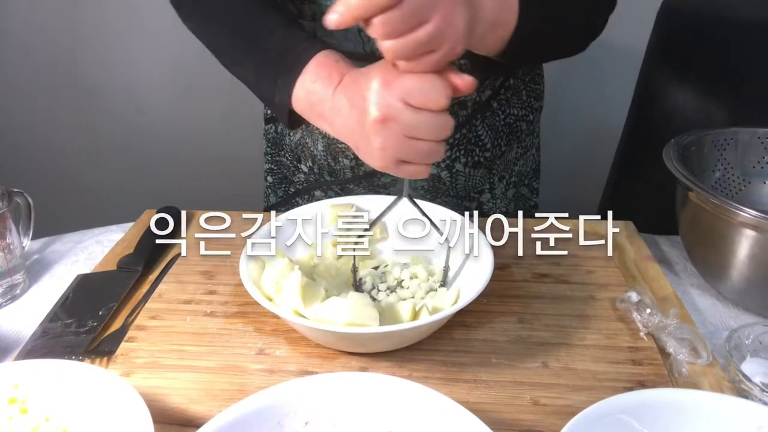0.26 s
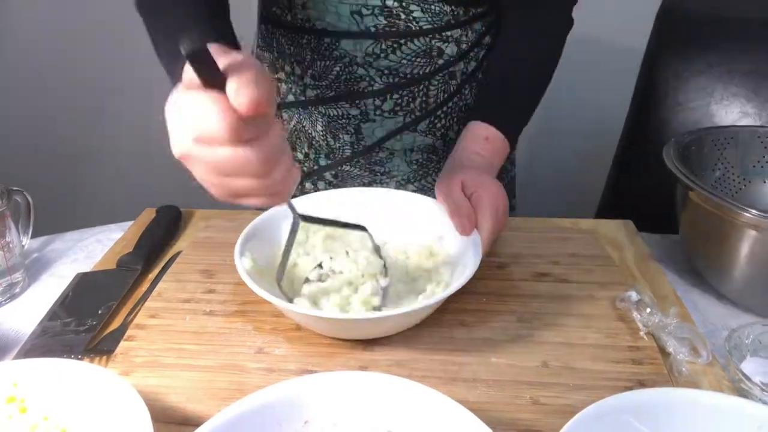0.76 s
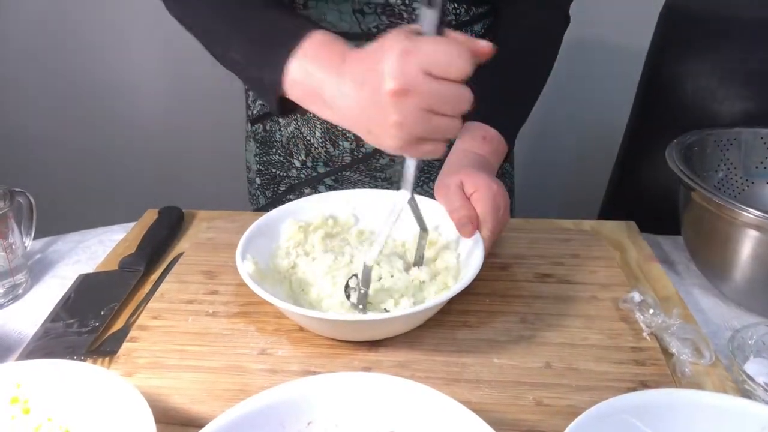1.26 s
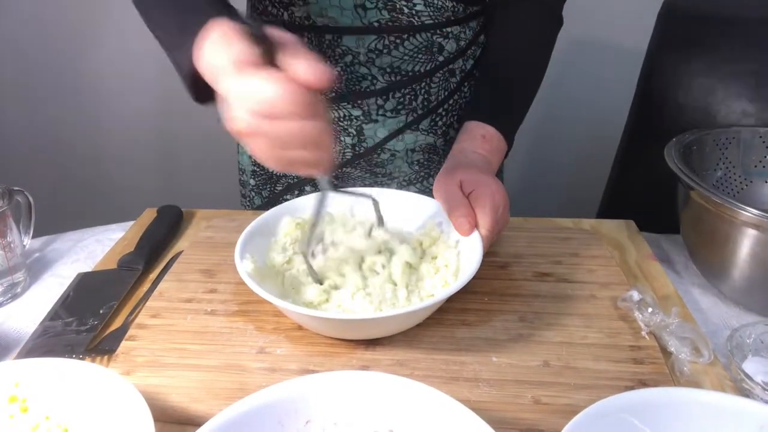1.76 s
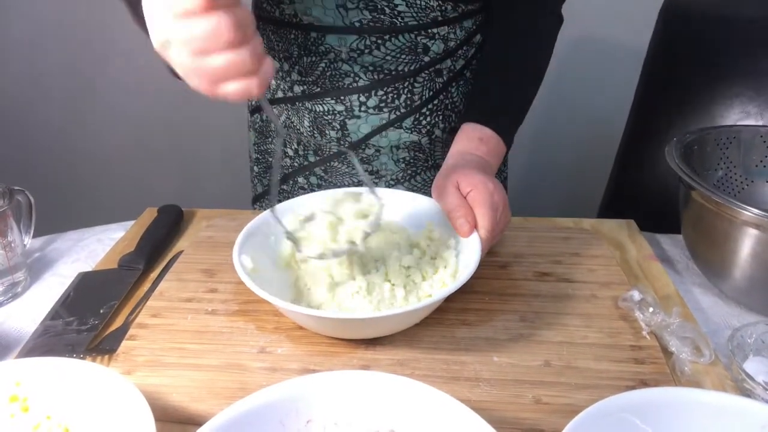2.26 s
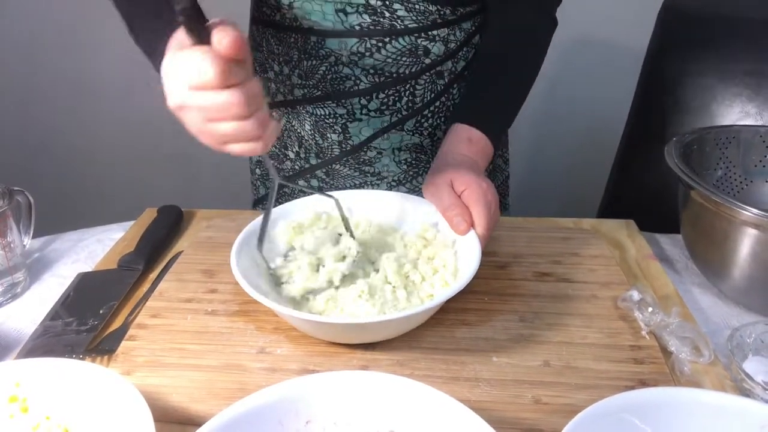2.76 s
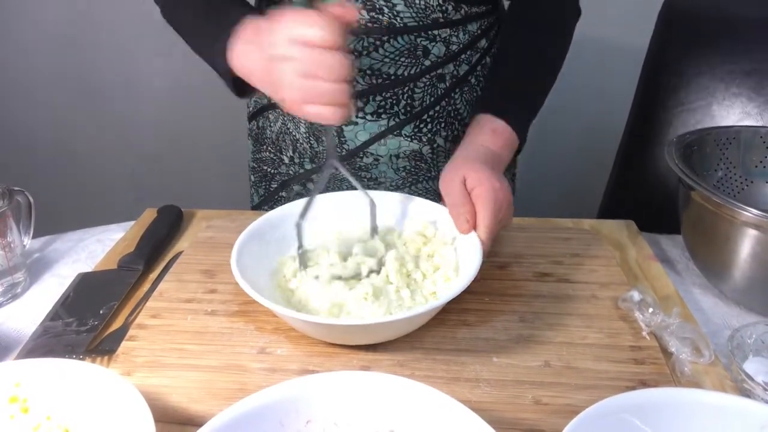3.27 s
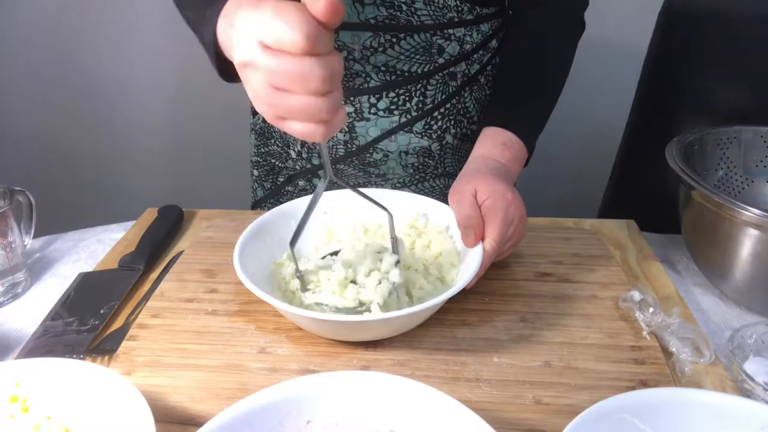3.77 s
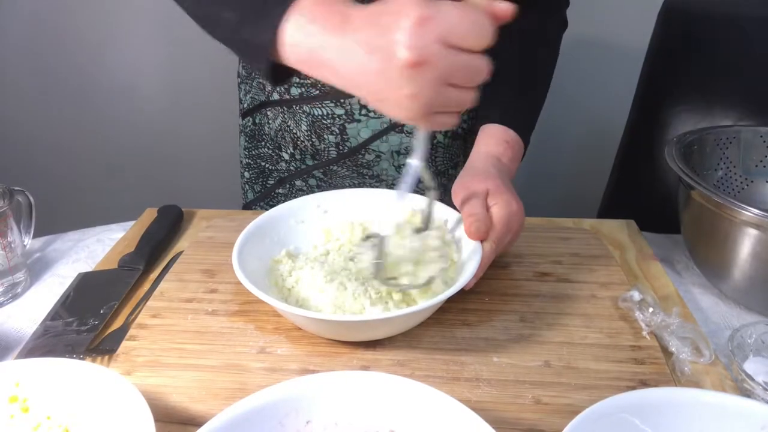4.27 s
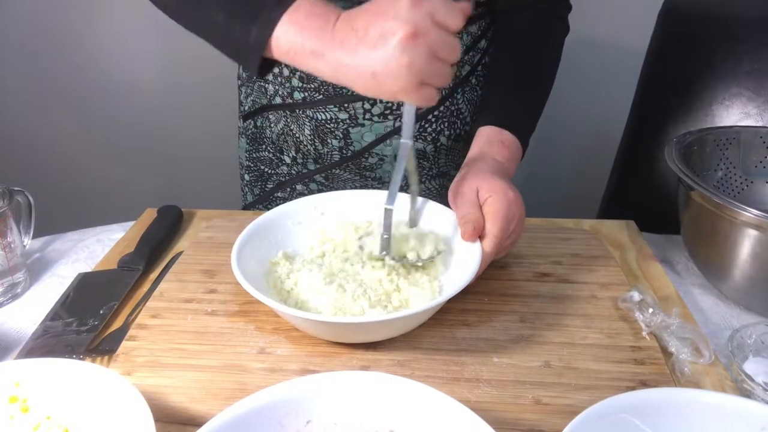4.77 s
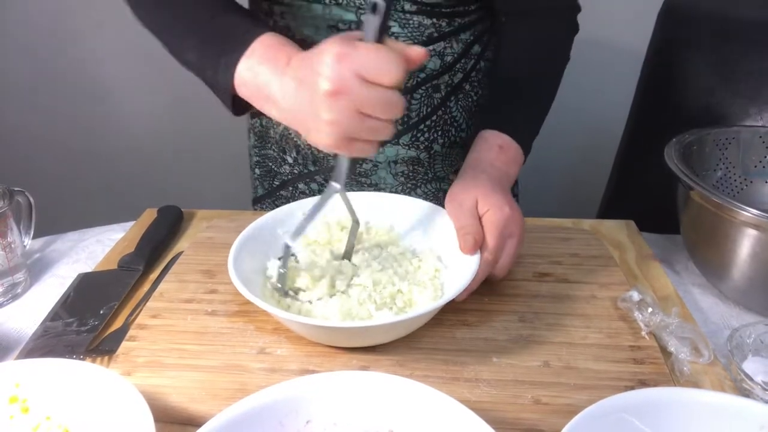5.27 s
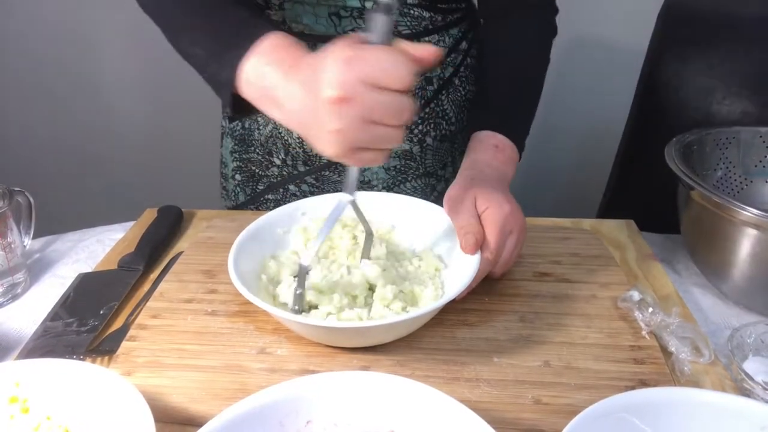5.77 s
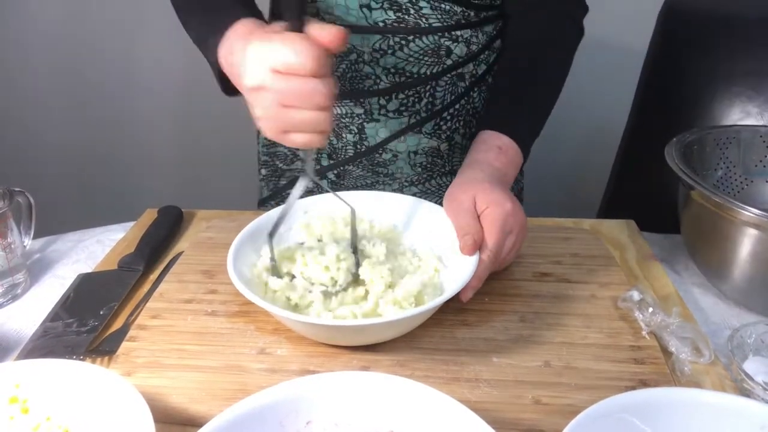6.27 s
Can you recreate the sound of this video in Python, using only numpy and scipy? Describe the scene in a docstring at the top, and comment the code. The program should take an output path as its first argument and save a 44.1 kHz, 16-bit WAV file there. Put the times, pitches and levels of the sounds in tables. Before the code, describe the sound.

Loud hum and room noise with soft squishes drop suddenly, then a wire masher softly clinks on a ceramic bowl, ending in a dull thud.

```python
"""A steel potato masher works boiled potatoes in a hand-held ceramic bowl on a wooden board.
At first hum and room noise are loud and the mash squishes: bursts of filtered noise over a faint rustle.
At 0.7 s the background drops, dips briefly and goes on lower, its mains hum beating against a slower motor.
From 1.1 s the wire knocks the bowl: damped modes and noise swell in softly and die away, amid short drags.
Last the bowl lands on the board with a dull thud, two low thumps and a faint squish."""
import sys
import numpy as np
from scipy import signal
from scipy.fft import rfft, irfft, next_fast_len
from scipy.io import wavfile

SR = 44100
rng = np.random.default_rng(int(sys.argv[2]) if len(sys.argv) > 2 else 0)


def transcribe(u):
    """Save the signal u as a 16-bit wav file named by the first command-line argument.

    u: samples, shape (n,) or (channels, n), limited to [-1, 1]; the rate is SR.
    q: integer samples, one column per channel.
    """
    v = np.clip(np.atleast_2d(u).T, -1, 1)
    q = np.round(v * 32767).astype(np.int16)
    wavfile.write(sys.argv[1], SR, q)


N = 288051

# overtones of the mains hum, before and after the drop; f is rounded to a multiple of 60 Hz:
# (f/Hz, early level/dB, later level/dB)
HUM_OVERTONES = [(119, -52.5, -63.5), (180, -70, -86.5), (240, -73, -87.5), (360, -79, -91),
                 (420, -73, -85.5)]
# relative spectral density of the room noise before and after the drop: (f/Hz, level/dB)
EARLY_ROOM_SPECTRUM = [(94, -22), (160, -13), (239, -2), (307, -2.5), (417, -1.5), (495, -6), (879, -6.5),
                       (2080, -16.5), (4470, -17.5), (10400, -30), (15500, -29)]
LATER_ROOM_SPECTRUM = [(94, -30), (160, 3), (205, -8.5), (239, -5), (325, -8.5), (364, -5), (386, -10),
                       (417, -9), (495, -12), (611, -11.5), (913, -13), (3760, -31), (15500, -46)]
# relative spectra of the low rumble and of the moist rustle: (f/Hz, level/dB)
RUMBLE_SPECTRUM = [(15, -8), (35, 2.0), (100, 1.0), (170, -4.5), (260, -21.0), (1000, -74.0)]
RUSTLE_SPECTRUM = [(500, -22.5), (1500, 4), (4000, 4.5), (7000, -2.5), (15000, -7.5)]
# soft short bursts: squishes, and two low thumps after the last thud; level before the Gaussian outline:
# (t/s, Gaussian half length/s, level/dB, centre f/Hz, spectral width/octaves)
SOFT_BURSTS = [(0.149, 0.017, -64, 6600, 1), (0.463, 0.015, -69, 4500, 0.43),
               (0.535, 0.013, -64, 3680, 0.43), (0.595, 0.025, -68, 11000, 1),
               (0.605, 0.034, -64.5, 2240, 0.75), (0.776, 0.015, -66, 1270, 0.16),
               (0.774, 0.0099, -77.5, 3980, 0.58), (2.036, 0.012, -64.5, 1440, 0.64),
               (2.087, 0.025, -71.5, 1540, 0.51), (2.175, 0.023, -69.5, 810, 1),
               (2.195, 0.013, -76.5, 6900, 1), (3.049, 0.035, -75.5, 3300, 0.32),
               (5.478, 0.024, -81, 6130, 1), (6.197, 0.0051, -51, 333, 0.39),
               (6.228, 0.0042, -59, 322, 0.43), (6.449, 0.02, -78, 2060, 0.25)]
# the wire drags on the glaze, level before the Gaussian outline:
# (t/s, Gaussian half length/s, level/dB, favoured f/Hz, treble tilt/dB per octave)
SCRAPES = [(2.617, 0.012, -59.5, 3930, -2.5), (2.639, 0.0088, -44, 4020, -3.5),
           (2.698, 0.027, -57, 2020, -1.5), (2.733, .015, -63, 6080, -1), (3.888, 0.0092, -70, 3930, 7),
           (4.389, 0.016, -62, 3590, -3.5)]
# modes in which bowl and wire ring together, relative level: (f/Hz, level/dB, t60/s)
MODES = [(251, -6, 0.31), (340, -7.5, 0.28), (602.3, -6.5, 0.13), (824, -12, .12), (1042, -4.5, 0.14),
         (1211, 2.5, 0.084), (1332, 3, 0.2), (1403, -1.5, 0.1), (1840, -5.5, 0.091), (2022, -4, 0.085),
         (2240, -2.5, 0.12), (2330, -9, 0.098), (2430, -1, 0.11), (2554, -4.5, 0.13), (2743, -5, 0.16),
         (2986, -7, 0.09), (3442, -4, 0.18), (3630, -2, 0.14), (3870, -3, .12), (3933, -1.5, .11),
         (4070, -1, 0.11), (4430, -3, .12), (4520, -4.5, .12), (4700, -0.5, 0.19), (4980, -2, 0.16),
         (6045, 0.5, 0.18), (6840, -9, .11), (7520, -5, 0.099), (7930, -10.5, .1), (9110, -1, 0.08),
         (10020, -7, .07), (10970, -3.5, .07), (13000, -6, .06)]
# broadband contact noise between the modes, relative level: (f/Hz, level/dB)
CRACK_SPECTRUM = [(70, -35), (170, -0.5), (450, -8), (900, -6.5), (1650, -3.5), (2100, -9.5), (5000, -6.5),
                  (5550, -13), (6400, -5), (8300, -8.5), (9700, -6), (10400, -10.5), (12000, -7.5),
                  (15500, -12)]
# decay of the contact noise after a blow: (f/Hz, t60/s)
CRACK_DECAY = [(300, 0.12), (1300, 0.18), (3000, 0.18), (6000, 0.18), (12000, 0.1)]
# edges of the six registers thud, knock, clack, clink, ping, tick: (f/Hz)
REGISTER_EDGES = [190, 900, 1850, 3100, 5400, 8300, 15500]
# masher on bowl; the last is a dull thud of the bowl on the board:
# (t/s, width of the peak/s, swell-in level/dB, ring over crack in the low registers/dB,
#  four favoured f/Hz, two nodal f/Hz, six register levels around the peak/dB)
BLOWS = [(1.09, 0.005, -8.5, -8.5, 1410, 2300, 3425, 6040, 1900, 5600, -58, -54.5, -50, -52, -67, -63.5),
         (1.917, 0.0038, -9, -7, 1360, 3950, 4460, 9150, 2416, 7280, -55, -41.5, -47.5, -40.5, -49.5, -50),
         (2.353, 0.0083, -14.5, -5.5, 1380, 2745, 3570, 9160, 1130, 5450, -64, -49.5, -50.5, -50.5, -64, -61.5),
         (2.654, 0.0021, -6, -8, 2764, 3420, 4026, 6040, 2290, 5480, -59.5, -54, -46, -41.5, -61, -56),
         (2.937, 0.0053, -10, -2, 2570, 4420, 6870, 7930, 1750, 3090, -59.5, -55.5, -46.5, -46, -48, -55),
         (3.820, 0.0076, -7, -8.5, 2330, 2980, 4100, 6150, 1940, 8080, -55.5, -52.5, -47, -42, -50, -58.5),
         (4.322, 0.0076, -20.5, -5.5, 1049, 2244, 2430, 3590, 3190, 4320, -59, -57, -50, -57.5, -67.5, -69.5),
         (4.726, 0.0061, -11.5, -3.5, 1215, 3420, 4200, 4660, 3020, 8200, -60.5, -55, -53.5, -50.5, -56.5, -61.5),
         (5.045, 0.007, -16, 3.5, 1184, 2447, 4680, 6080, 1770, 5450, -58, -48.5, -38, -46, -45, -51.5),
         (5.855, 0.011, -16, -13.5, 1040, 1180, 1350, 2020, 5600, 6040, -74, -62, -71.5, -75.5, -81, -82.5),
         (6.181, 0.015, -7, -11, 250, 360, 610, 1400, 930, 5530, -55.5, -65.5, -83.5, -92.5, -100, -105)]

EARLY_ROOM_DB, LATER_ROOM_DB = -64, -75
DROP_S, DIP_END_S = 0.711, 0.741  # midpoint of the fall; the later level is half of full gain here
MAINS_HZ, MAINS_DB = 59.9, -65.5
# the motor lags the mains by SLIP_HZ and is in step with it at IN_STEP_S
MOTOR_DB, SLIP_HZ, IN_STEP_S = -75, 2.39, 3.46
TOP_HZ = 15750
TIME = np.arange(N) / SR
LOCAL = np.arange(-4410, 13230) / SR  # time around one event (s)


def undb(db):
    """A level in decibels is twenty times the logarithm of the gain."""
    return 10 ** (np.asarray(db) / 20)


def unit(x):
    """Normalisation brings the root mean square to 1."""
    return x / np.sqrt(np.mean(x ** 2) + 1e-30)


def shape(x, gain):
    """A linear filter multiplies the spectrum by a gain, here a function of frequency in Hz."""
    size = next_fast_len(len(x), True)
    hz = np.fft.rfftfreq(size, 1 / SR) + 0.0014  # the offset keeps zero out of logarithms
    return irfft(rfft(x, size) * gain(hz), size)[:len(x)]


def lookup(hz, points):
    """Interpolation between (f/Hz, value) points is linear in log frequency."""
    f, value = np.transpose(points)
    return np.interp(np.log(hz), np.log(f), value)


def noise(points, size):
    """Filtered white noise takes the given (f/Hz, level/dB) spectrum, at rms 1."""
    return unit(shape(rng.standard_normal(size), lambda f: undb(lookup(f, points))))


def bell(x, width):
    """A Gaussian equals 1 at zero and falls off over the width."""
    return np.exp(-.5 * (x / width) ** 2)


def walk(rate_hz, size):
    """Noise limited to low frequencies is a smooth random fluctuation, at rms 1."""
    return unit(shape(rng.standard_normal(size), lambda f: bell(f, rate_hz)))


def add(out, s, sound):
    """Superposition: a sound on the LOCAL time base is summed into the scene at time s."""
    index = int(s * SR) + np.round(LOCAL * SR).astype(int)
    inside = (index >= 0) & (index < N)
    out[index[inside]] += sound[inside]


def mains(hz):
    """A harmonic of hum is a sinusoid at the nearest multiple of 60 Hz, at rms 1."""
    return np.sqrt(2) * np.sin(2 * np.pi * (60 * round(hz / 60) * TIME + rng.random()))


def beating_hum():
    """Beats: the mains hum and a slightly slower motor drift in and out of step."""
    phase = 2 * np.pi * (MAINS_HZ * TIME + rng.random())
    lag = 2 * np.pi * SLIP_HZ * (TIME - IN_STEP_S)
    mains_hum = undb(MAINS_DB) * np.sin(phase)
    motor_hum = undb(MOTOR_DB) * np.sin(phase - lag)
    return np.sqrt(2) * (mains_hum + motor_hum)


def background(early_rumble_db=-61, rumble_db=-78, early_hum_db=-53, dip_db=-14, fade_s=0.031):
    """Tones and noise superpose; their level drops, dips briefly and goes on lower."""
    early = undb(EARLY_ROOM_DB) * noise(EARLY_ROOM_SPECTRUM, N)
    early += undb(early_rumble_db) * noise(RUMBLE_SPECTRUM, N)
    early += undb(early_hum_db) * mains(60)
    later = undb(LATER_ROOM_DB) * noise(LATER_ROOM_SPECTRUM, N)
    later += undb(rumble_db) * noise(RUMBLE_SPECTRUM, N)
    later += beating_hum()
    for hz, early_db, later_db in HUM_OVERTONES:
        overtone = mains(hz) * (1 + 0.057 * walk(6, N))
        early += undb(early_db) * overtone
        later += undb(later_db) * overtone
    fall = np.clip((DROP_S - TIME) / fade_s + .5, 0, 1)
    rise = np.clip((TIME - DIP_END_S) / fade_s + .5, undb(dip_db), 1)
    return early * fall + later * rise


def mash(db=-83, swell_db=2, grain_db=-0.5):
    """Amplitude modulation of noise: a faint moist rustle comes and goes as the potato moves."""
    rustle = noise(RUSTLE_SPECTRUM, N)
    level_db = swell_db * walk(15, N) + grain_db * walk(60, N)
    return undb(db) * unit(rustle * undb(level_db))


def soft_burst(half_s, db, hz, octaves, grain_db=3):
    """Band-limited noise of grainy level under a Gaussian outline: a squish, or a thump if low."""
    grains = rng.standard_normal(len(LOCAL)) * undb(grain_db * walk(200, len(LOCAL)))
    burst = unit(shape(grains, lambda f: bell(np.log2(f / hz), octaves)))
    return undb(db) * burst * bell(LOCAL, half_s)


def mode_gains(favoured, favour_db=8, scatter_db=0.9):
    """Modal excitation: the contact point drives a few modes hard and the others by chance."""
    hz, db, _ = np.transpose(MODES)
    near = np.max([bell(np.log(hz / f), .014) for f in favoured], axis=0)
    return undb(db + favour_db * near + scatter_db * rng.standard_normal(len(hz)))


def ringing(gains, outline, rough=0.37, flutter_hz=45):
    """Modal synthesis: modes sum, each with a random flutter, the high ones most."""
    out = 0
    for (hz, _, t60), gain in zip(MODES, gains):
        wobble = walk(flutter_hz, len(LOCAL)) + 1j * walk(flutter_hz, len(LOCAL))
        flutter = 1 + rough * np.sqrt(hz / 2500) * wobble
        tone = np.real(flutter * np.exp(2j * np.pi * (hz * LOCAL + rng.random())))
        out = out + gain * tone * outline(t60)
    return out


def cracking(gains, ripple_db=-3, spread_s=.0025):
    """Wet potato broadens the resonances; a random comb gives each crack its own peaks and notches."""
    widths_hz = [60 + .011 * hz for hz, _, _ in MODES]

    def peaks(f):
        power = 0
        for (hz, _, _), gain, width_hz in zip(MODES, gains, widths_hz):
            power = power + gain ** 2 / (1 + ((f - hz) / width_hz) ** 4)
        return np.sqrt(power)

    delays_s = spread_s * (.3 + rng.random(size=3))

    def comb(f):
        ripple = np.mean([np.exp(2j * np.pi * f * d) for d in delays_s], axis=0)
        return abs(1 + undb(ripple_db) * ripple)

    def colour(f):
        return np.hypot(peaks(f), undb(lookup(f, CRACK_SPECTRUM))) * comb(f)

    return unit(shape(rng.standard_normal(len(LOCAL)), colour))


def scrape(half_s, db, hz, tilt_db, grit_db=0):
    """Sustained friction keeps the modes sounding, one above all, with some grit."""
    gains = mode_gains((hz,), favour_db=18)
    # each mode sounds in proportion to its decay time
    rub = unit(ringing(gains, lambda t60: t60)) + undb(grit_db) * cracking(gains)
    tilted = unit(shape(rub, lambda f: undb(tilt_db * np.log2(1 + f / 1000))))
    return undb(db) * tilted * bell(LOCAL, half_s)


def envelope(peak_s, swell_db, t60, ring_db=-10.5, swell_s=.017, lead_s=0.055, firmness=0.98):
    """Outline of a clink: it swells in softly, peaks briefly, then dies away exponentially."""
    before, after = np.minimum(LOCAL, 0), np.maximum(LOCAL, 0)
    onset = np.clip(2 * (1 + before / lead_s), 0, 1)
    swell = undb(swell_db) * np.exp(before / swell_s) * onset
    ring = undb(ring_db - 60 * after / t60)
    peak = np.exp(-(abs(LOCAL) / peak_s) ** firmness)
    return np.hypot(peak, np.where(LOCAL < 0, swell, ring))


def blow(peak_s, swell_db, ring_db, favoured, nodes, levels_db,
         damped_hz=6000, node_db=-13, node_hz=170):
    """Modal excitation by a blow: ringing modes and a noisy crack, balanced register by register."""
    core = abs(LOCAL) < .025  # each register's level is set over this span (s)
    gains = mode_gains(favoured)
    # the hardest-driven modes are the ones that keep ringing
    ring = ringing(gains ** 1.6, lambda t60: envelope(peak_s, swell_db, t60))

    # modes with a node at the contact point are weakened
    def hollow(f):
        return undb(node_db * sum(bell(f - hz, node_hz * np.sqrt(hz / 3000)) for hz in nodes))

    ring, crack = shape(ring, hollow), shape(cracking(gains), hollow)
    out = 0
    for lo, hi, db in zip(REGISTER_EDGES, REGISTER_EDGES[1:], levels_db):
        def band(f):
            return 1 / np.sqrt((1 + (lo / f) ** 20) * (1 + (f / hi) ** 20))

        outline = envelope(peak_s, swell_db, lookup(np.sqrt(lo * hi), CRACK_DECAY))
        # the top of the range hardly rings
        share = undb(ring_db) / (1 + (lo / damped_hz) ** 4)
        part = unit(shape(crack * outline, band)) + share * unit(shape(ring, band))
        out = out + undb(db) * part / np.std(part[core])
    return out


def scene():
    """Superposition of soft bursts, drags and blows over the kitchen background."""
    out = background() + mash()
    for s, *row in SOFT_BURSTS:
        add(out, s, soft_burst(*row))
    for s, *row in SCRAPES:
        add(out, s, scrape(*row))
    for s, peak_s, swell_db, ring_db, *colour in BLOWS:
        favoured, nodes, levels_db = colour[:4], colour[4:6], colour[6:]
        add(out, s, blow(peak_s, swell_db, ring_db, favoured, nodes, levels_db))
    return out[None]


def record(dry):
    """A steep elliptic low-pass limits the bandwidth to TOP_HZ."""
    low_pass = signal.ellip(10, .1, 70, TOP_HZ, fs=SR, output="sos")
    return signal.sosfilt(low_pass, dry)


dry = scene()
out = record(dry)
transcribe(out)
```